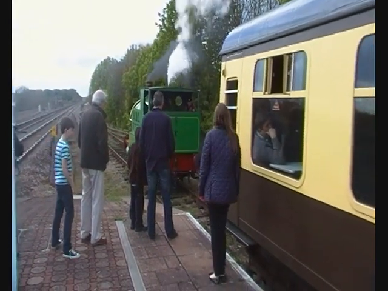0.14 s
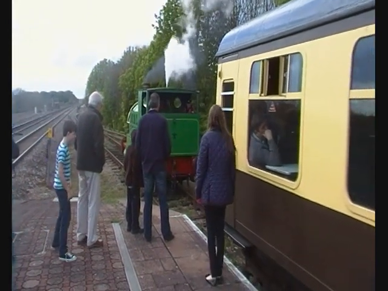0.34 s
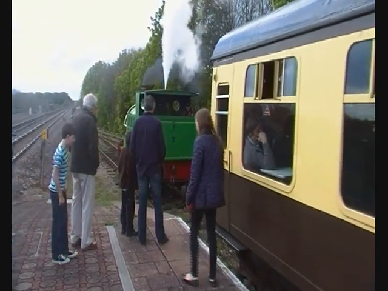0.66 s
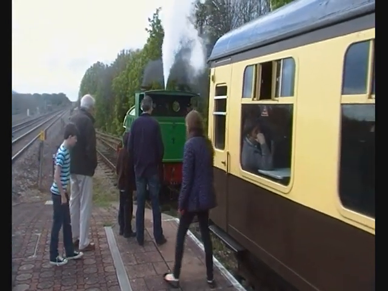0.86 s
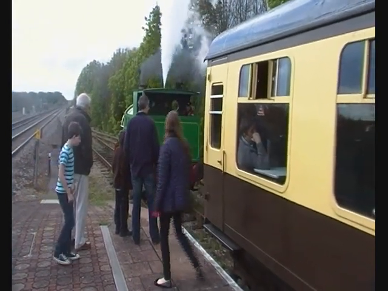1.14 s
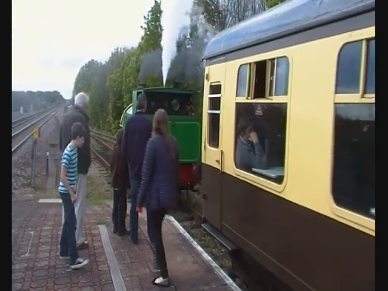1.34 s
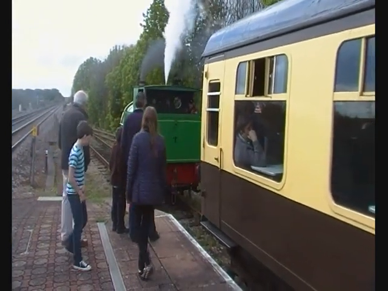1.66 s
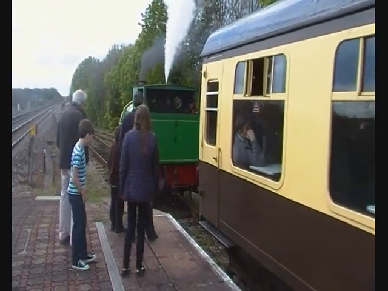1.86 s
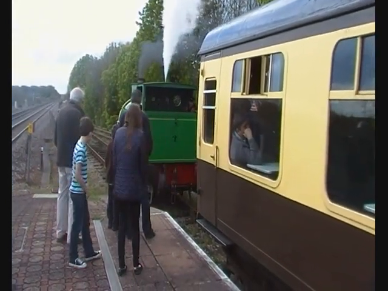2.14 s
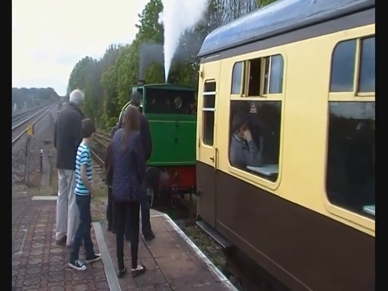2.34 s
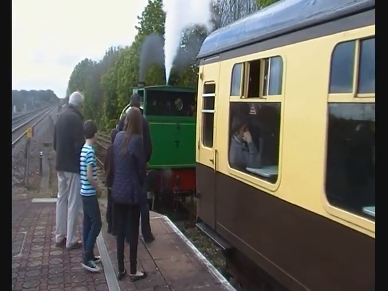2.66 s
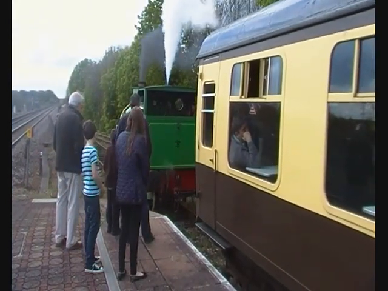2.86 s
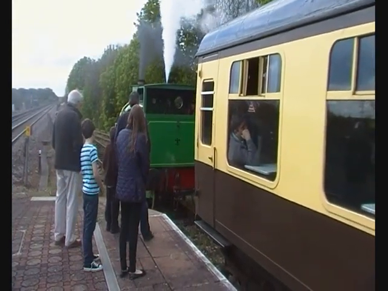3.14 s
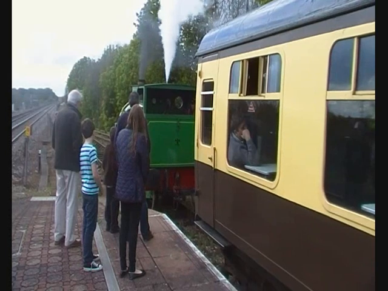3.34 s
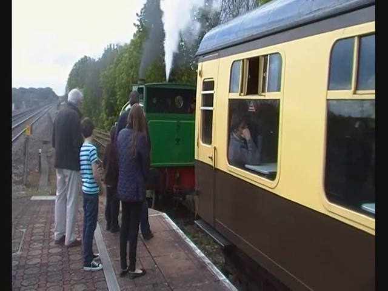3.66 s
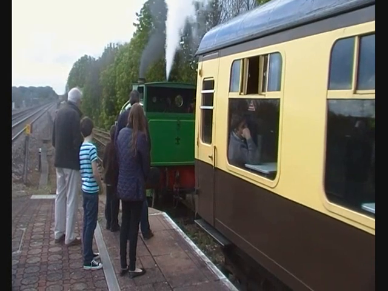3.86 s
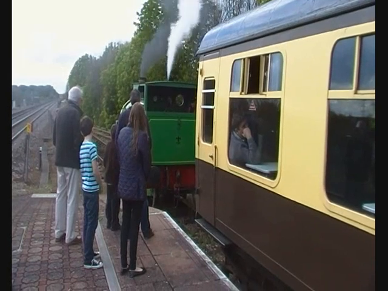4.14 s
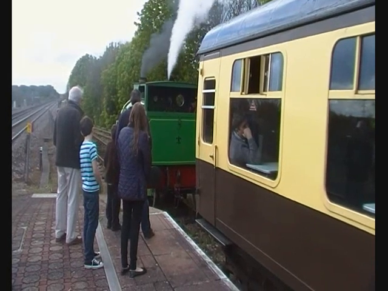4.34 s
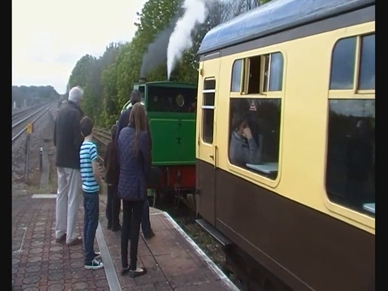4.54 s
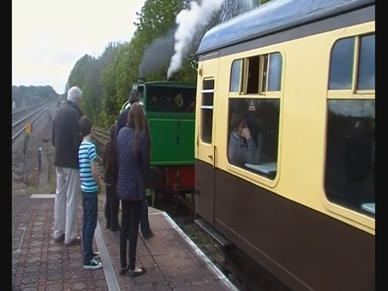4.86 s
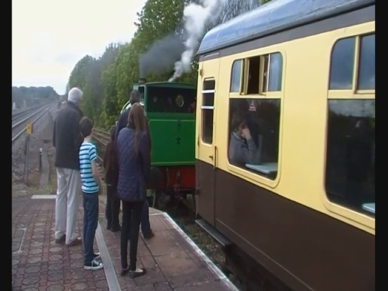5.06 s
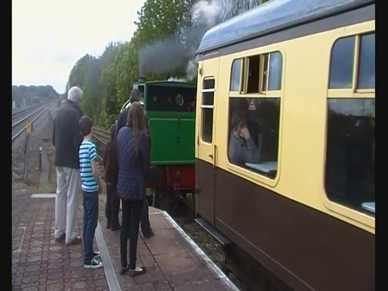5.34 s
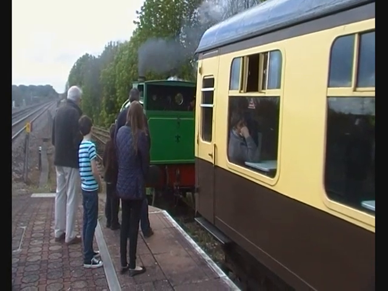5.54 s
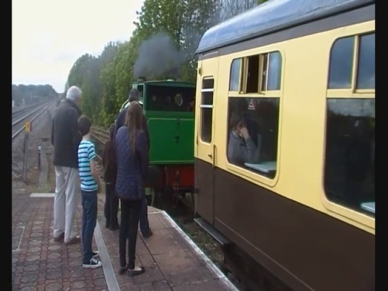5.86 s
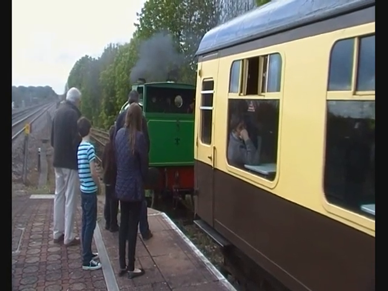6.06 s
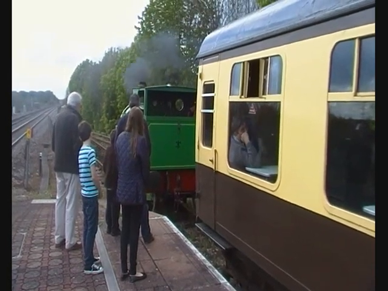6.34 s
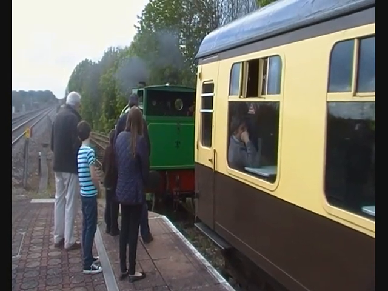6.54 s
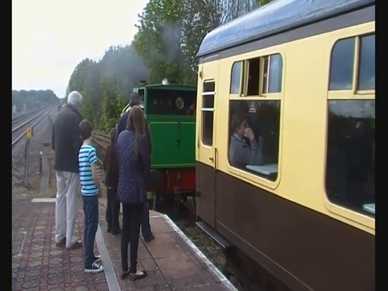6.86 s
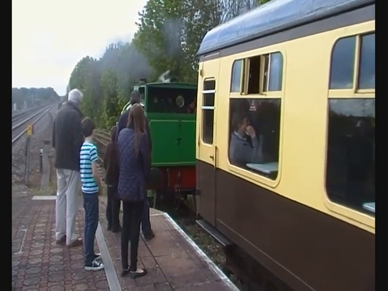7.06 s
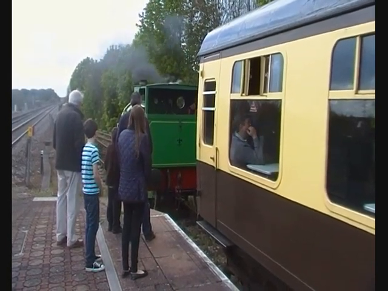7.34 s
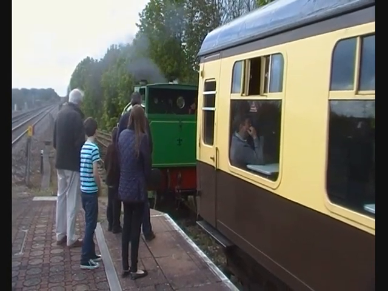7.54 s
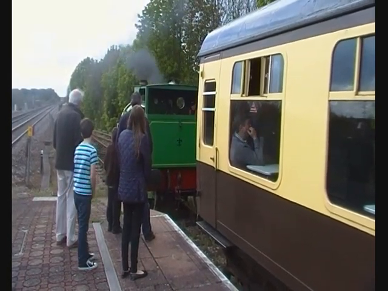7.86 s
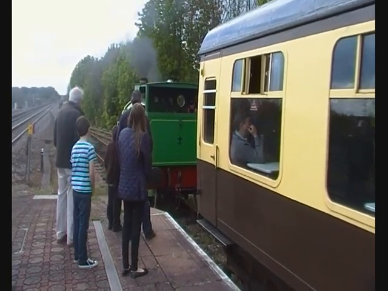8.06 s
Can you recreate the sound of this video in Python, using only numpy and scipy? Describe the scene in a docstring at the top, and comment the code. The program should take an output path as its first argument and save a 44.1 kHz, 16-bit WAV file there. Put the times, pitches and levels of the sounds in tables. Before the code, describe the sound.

Fierce pressurised steam hisses from a tank engine, surging and fluttering, with unsteady whistling tones around it and breeze buffeting the stereo microphones early on. After about five seconds the valve closes abruptly and the hiss drops away. A deep, uneven hum grows beneath soft leaking steam and lumpy wind rumble in the open air. A single small tick comes just before the end. No voices; wide, slightly hollow, comb-coloured sound.

```python
"""A fierce hiss with a wavering whistle: a tank engine at a country platform, its safety valve blowing off.
After five seconds the valve reseats, leaving a low drone, a faint leak of steam and one small click.
The steam is banded noise coloured by the valve's casing; the whistles are sliding tones blurred by noise.
The drone is a throbbing deep tone, and a breeze rumbles and thumps on the microphones.
A stereo widener feeds each side late into the other and combs the sound."""
import sys
import numpy as np
from scipy.fft import rfft, irfft, next_fast_len
from scipy.io import wavfile

SR = 44100
rng = np.random.default_rng(int(sys.argv[2]) if len(sys.argv) > 2 else 0)


def dump_mix(stems):
    """Bounce the given channels to the path in sys.argv[1] as a 16-bit WAV at rate SR."""
    frames = np.atleast_2d(stems).T  # one column per channel
    limited = np.clip(frames, -1, 1)  # hard clip at full scale
    pcm = np.round(limited * 32767).astype(np.int16)
    wavfile.write(sys.argv[1], SR, pcm)


N = 361163
TIME = np.arange(N) / SR  # seconds
SIZE = next_fast_len(N + 4096)  # transform length, with room for delays
FREQ = np.maximum(np.fft.rfftfreq(SIZE, 1 / SR), 1)  # Hz
CUTOFF_HZ = 12000  # top of the noise sources and of the finished sound


def from_db(db):
    """Decibels to gain."""
    return 10 ** (np.asarray(db) / 20)


def rms_one(x):
    """Scale to rms 1."""
    return x / np.sqrt(np.mean(x ** 2) + 1e-20)


def in_time(rows):
    """A curve of (time, value) rows, drawn in straight lines through every sample."""
    s, value = np.transpose(rows)
    return np.interp(TIME, s, value)


def swells(rows, floor_db):
    """Level in dB of smooth swells added in power to a floor; each is at half power half its length from its top."""
    power = from_db(floor_db) ** 2
    for top_s, length_s, level_db in rows:
        distance = 2 * (TIME - top_s) / length_s
        power = power + from_db(level_db) ** 2 * .5 ** (distance ** 2)
    return 10 * np.log10(power)


def colour(points):
    """Gain at every frequency, straight lines in dB over log frequency."""
    hz, db = np.transpose(points)
    return from_db(np.interp(np.log(FREQ), np.log(hz), db))


def low_passed(x, corner_hz):
    """Dull the treble, 24 dB an octave."""
    return irfft(rfft(x, SIZE) / (1 + (FREQ / corner_hz) ** 4), SIZE)[:, :N]


def white():
    """Spectrum of fresh white noise."""
    return rfft(rng.standard_normal(SIZE))


def drift(rate):
    """Random wandering of rms 1, changing about rate times a second."""
    return rms_one(irfft(white() / (1 + (FREQ / rate) ** 2), SIZE)[:N])


def stereo_noise(spectrum, side_db):
    """Coloured noise, left and right; the part they share has rms 1."""
    gain = colour(spectrum) * (FREQ < CUTOFF_HZ)
    mid = irfft(white() * gain, SIZE)[:N]
    side = irfft(white() * gain * colour(side_db), SIZE)[:N]
    return np.array([mid + side, mid - side]) / np.std(mid)


def narrow_noise(hz, width_hz):
    """A resonance stirred by turbulence: a randomly modulated carrier whose centre may move."""
    phase = 2 * np.pi * np.cumsum(hz * np.ones(N)) / SR
    return rms_one(drift(width_hz) * np.cos(phase) + drift(width_hz) * np.sin(phase))


def turbulent(x, brightness, flutter_db, flutter_rate, count=8):
    """Overlapping bands, tilted about 4200 Hz, each fluttering on its own."""
    spectrum = rfft(x, SIZE)
    centres = np.geomspace(1000, 11000, count)
    out = 0
    for hz, own in zip(centres, np.eye(count)):
        weight = np.interp(np.log(FREQ), np.log(centres), own)
        band = irfft(spectrum * weight, SIZE)[:, :N]
        octaves = np.log2(max(hz, 1800) / 4200)  # bands below 1800 Hz share one tilt
        out = out + band * from_db(brightness * octaves + flutter_db * drift(flutter_rate))
    return out


SHUT_S, CLOSING_S = 4.886, .46  # when the valve begins to sink, and how long it takes
SHUT_DROP_DB, SHUT_DULLING = 28, 5.1  # loss once shut: level, and brightness in dB per octave


def valve_shut():
    """How far the valve has sunk onto its seat, from 0 (open) to 1."""
    return np.clip((TIME - SHUT_S) / CLOSING_S, 0, 1)


# spectrum of the open jet: freq_hz [Hz], density_db [relative dB per Hz]
JET_SPECTRUM = [(300, -26), (700, -18), (1200, -8), (1550, -7.5), (1900, -6.5), (2500, -10.5), (3050, 1),
                (4200, 1), (5200, -2.5), (6600, -7), (9600, -7.5), (12000, -13)]
# stereo spread of the jet: freq_hz [Hz], side_minus_mid_db [dB]
JET_SPREAD = [(60, -23), (300, -21), (700, -8.5), (1300, -11.5), (3000, -12.5), (5000, -7), (7000, 0.5),
              (11000, -8.5)]
# resonances of the valve's casing that the jet excites: freq_hz [Hz], width_hz [Hz], boost_db [dB]
CASING_RESONANCES = [(1120, 500, 1), (1853, 160, 4.5), (2358, 270, 7.5), (2804, 38, 3.5), (4530, 76, -1.5),
                     (5200, 130, 1.5)]
# surges of the jet: top_s [s], length_s [s], level_db [dB before trim]
JET_SURGES = [(.42, 0.35, -24), (.87, .15, -26), (1.55, 0.15, -24.5), (2.08, 0.3, -24), (4.84, 0.051, -29)]
# tone as the plume sways: time_s [s], brightness [dB per octave, before the valve's dulling]
PLUME_BRIGHTNESS = [(0, -.3), (.45, -0.4), (.7, 3), (1.1, 1), (2.1, 0.4), (2.35, 1.8), (3.95, 1.9),
                    (4.3, 0.5), (4.85, -1)]
# the jet's bounce off the platform as the listener walks up: time_s [s], delay_ms [ms]
PLATFORM_BOUNCE = [(0, 1.9), (.4, 2.37), (.85, 1.45), (2.2, 1.73), (3.2, 1.795), (5, 1.75)]
JET_DB, JET_TRIM_DB = -19.5, -2.5  # steady level beneath the surges; trim on both
OPENING_DB, OPENING_S = 1.5, 0.63  # the jet starts this much weaker and builds


def safety_valve():
    """Jet noise rings in the casing, surges, then sinks and dulls as the valve shuts; the platform returns it."""
    shut = valve_shut()
    opening_db = -OPENING_DB * np.maximum(1 - TIME / OPENING_S, 0)
    level_db = swells(JET_SURGES, floor_db=JET_DB) + opening_db - SHUT_DROP_DB * shut
    roughness_db = 0.45 * drift(6.7) + 0.9 * drift(64)
    brightness = in_time(PLUME_BRIGHTNESS) - SHUT_DULLING * shut
    casing_db = sum(boost_db / (1 + (2 * (FREQ - hz) / width_hz) ** 2)
                    for hz, width_hz, boost_db in CASING_RESONANCES)
    noise = stereo_noise(JET_SPECTRUM, JET_SPREAD)
    jet = irfft(rfft(noise, SIZE) * from_db(casing_db), SIZE)[:, :N]
    jet = turbulent(jet, brightness, flutter_db=0.98, flutter_rate=9.7)
    jet = jet * from_db(level_db + JET_TRIM_DB + roughness_db)
    scattered = low_passed(jet, corner_hz=3470)  # rough paving returns little treble
    bounce_time = TIME - in_time(PLATFORM_BOUNCE) / 1000
    bounce = np.array([np.interp(bounce_time, TIME, side) for side in scattered])
    return jet + from_db(-11.0) * bounce


SCOOP_SHARE, SCOOP_S = .12, .075  # each starts this share flat and scoops up with this time constant
WHISTLE_ATTACK_S, WHISTLE_FADE_DB_PER_S, WHISTLE_RELEASE_S = 0.084, 3, 0.077


def edge_tone(row, waver, steadiness, clear_width_hz, breathy_width_hz):
    """A whistle, part clear line and part breathy rush, that scoops up to its pitch, sags and dissolves."""
    start_s, length_s, pitch_hz, sag, level_db, clarity = row
    age = np.maximum(TIME - start_s, 0)
    scoop = 1 - SCOOP_SHARE * np.exp(-age / SCOOP_S)
    hz = pitch_hz * scoop - sag * age + waver
    sine = np.sin(2 * np.pi * np.cumsum(hz) / SR)
    line = rms_one(steadiness * sine + narrow_noise(hz, clear_width_hz))
    rush = narrow_noise(hz, breathy_width_hz)
    tone = np.sqrt(clarity) * line + np.sqrt(1 - clarity) * rush
    attack = np.minimum(age / WHISTLE_ATTACK_S, 1)
    release = np.exp(-np.maximum(age - length_s, 0) / WHISTLE_RELEASE_S)
    return from_db(level_db - WHISTLE_FADE_DB_PER_S * age) * attack * release * tone


# edge tones at the valve lip: start_s [s], length_s [s], pitch_hz [Hz], sag [Hz per s],
# level_db [dB before fade and flutter], clarity [0-1]
EDGE_TONES = [(-.15, 0.41, 4250, 49.5, -25, 0.13), (.13, 0.59, 5165, 900, -26, .35),
              (0.501, .4, 3238, 31, -25.5, 0.1), (0.919, 0.33, 3360, 520, -22, 1),
              (1.25, 0.98, 3170, 400, -25.5, 0.33), (1.45, 0.9, 5040, 149.5, -29, 0.1),
              (2.27, 0.59, 3420, 370, -20, .9), (2.855, 1.13, 3194, 40, -25, .15),
              (3.1, 1.8, 4640, 0, -30, .3), (3.958, 0.91, 2904, 220, -26.5, 0.34),
              (4.739, 0.12, 4710, 0, -24, 0.04)]


def whistles(waver_hz, flutter_db):
    """The edge tones waver and flutter with the one jet that feeds them, and sink as the valve shuts."""
    waver = waver_hz * drift(60.1)
    tones = sum(edge_tone(row, waver, steadiness=1.76, clear_width_hz=63, breathy_width_hz=430)
                for row in EDGE_TONES)
    return tones * from_db(flutter_db * drift(10) - SHUT_DROP_DB * valve_shut())


# partials of the drone: multiple [of its pitch], level_db [relative dB]
DRONE_PARTIALS = [(1, -3), (2, -24)]
# swells of the drone: top_s [s], length_s [s], level_db [dB before trim]
DRONE_RISES = [(.3, 0.8, -31.5), (1.9, 0.6, -25), (3.45, 1.6, -28), (4.47, 0.21, -23), (5.3, 0.47, -16.5),
               (6.4, 1.26, -9.5)]
DRONE_HZ, DRONE_IDLE_DB, DRONE_TRIM_DB = 39.44, -39.5, -5.5  # pitch; floor beneath the swells; trim


def engine_drone():
    """A deep tone that throbs unevenly while it is weak and settles as it builds."""
    drone_db = swells(DRONE_RISES, floor_db=DRONE_IDLE_DB)
    phase = 2 * np.pi * np.cumsum(DRONE_HZ + 0.8 * drift(9.5)) / SR
    tone = sum(from_db(db) * np.sin(multiple * phase) for multiple, db in DRONE_PARTIALS)
    unsettled = np.clip((drone_db.max() - drone_db) / 7, .3, 1)
    throb = 1 + .28 * unsettled * narrow_noise(hz=14, width_hz=7)
    return from_db(drone_db + DRONE_TRIM_DB) * throb * rms_one(tone)


# hollow resonances of the engine: freq_hz [Hz], width_hz [Hz], level_db [relative dB]
HOLLOW_RESONANCES = [(54, 4.9, 5.5), (161.8, 5, 4), (349.7, 19, -15)]
# the hollow hum's rise: time_s [s], level_db [dB before trim]
HUM_RISE = [(2.6, -51.5), (4.3, -50), (4.8, -37), (8.19, -36)]


def hollow_hum():
    """Narrow noises at the engine's hollow resonances, sharing one level that rises, mostly near the valve's shutting."""
    hum = sum(from_db(db) * narrow_noise(hz, width_hz) for hz, width_hz, db in HOLLOW_RESONANCES)
    return from_db(in_time(HUM_RISE) - 2.0) * hum


# how loud the surroundings stand, for yard and breeze alike: time_s [s], level_db [relative dB]
SURROUNDINGS_LEVEL = [(0, 4), (1, -2), (2.6, -12.5), (4, -11), (4.8, -8.5), (5.2, 2.5), (8.19, 1.5)]
# open-air wash: freq_hz [Hz], density_db [relative dB per Hz]
YARD_SPECTRUM = [(200, 3.5), (300, 1.5), (450, 0.5), (700, -2.5), (1300, 1.5), (2200, -10)]
# stereo spread of wash and leak: freq_hz [Hz], side_minus_mid_db [dB]
YARD_SPREAD = [(150, -11), (300, -14.5), (700, -12), (1300, -11), (3000, -5.5), (5000, -5), (7000, 1.5),
               (11000, -5.5)]


def yard_wash():
    """The dull wash of the open yard, low-passed noise that wavers slightly."""
    wash = low_passed(stereo_noise(YARD_SPECTRUM, YARD_SPREAD), corner_hz=2780)
    return from_db(in_time(SURROUNDINGS_LEVEL) - 39 + .5 * drift(25)) * wash


# leaking steam: freq_hz [Hz], density_db [relative dB per Hz]
LEAK_SPECTRUM = [(600, -14), (1500, 1.5), (2300, -1.5), (3300, 7.5), (4500, 5), (6500, 1), (9500, 3.5),
                 (12000, 0.5)]
# the hiss left after the valve shuts wavers in level: top_s [s], length_s [s], level_db [dB before trim]
LEAK_WAVERS = [(5.16, 0.065, -35.5), (5.33, 0.15, -44), (5.66, 0.1, -38.5), (6.19, 0.13, -42),
               (6.65, .24, -41.5), (7.02, .11, -38.5), (7.26, .16, -40.5), (7.57, 0.22, -41),
               (7.81, 0.11, -36.5), (8.11, 0.17, -40.5)]
SEEP_DB, LEAK_TRIM_DB = -44.5, -2.5  # steady seep beneath the wavering; trim on both


def steam_leak():
    """Steam always seeps past the valve as fluttering noise; the hiss left after it shuts wavers in level."""
    leak_db = swells(LEAK_WAVERS, floor_db=SEEP_DB)
    noise = stereo_noise(LEAK_SPECTRUM, YARD_SPREAD)
    leak = turbulent(noise, brightness=0, flutter_db=0.9, flutter_rate=8.5)
    return from_db(leak_db + LEAK_TRIM_DB) * leak


# low breeze rumble: freq_hz [Hz], density_db [relative dB per Hz]
BREEZE_SPECTRUM = [(12, 4.5), (25, 2), (60, 7), (100, -1.5), (150, -8), (220, -17), (350, -35), (700, -81)]
# higher rush of the gusts: freq_hz [Hz], density_db [relative dB per Hz]
GUST_SPECTRUM = [(80, -12), (150, 5.5), (215, 4), (300, -13.5), (480, -6), (700, -24), (1500, -33)]
# stereo spread of the wind: freq_hz [Hz], side_minus_mid_db [dB]
WIND_SPREAD = [(30, -4), (120, -9.5), (300, -16.5)]
# gusts: top_s [s], length_s [s], rumble_db [dB], rush_db [dB]
WIND_GUSTS = [(0.153, 0.18, -43, -31.5), (0.436, .2, -29, -28.5), (0.844, 0.85, -49, -37.5),
              (1.897, 0.54, -38, -37), (3.248, 0.4, -39, -62), (4.445, 0.36, -29, -65),
              (5.6, 1.2, -28.5, -45.5), (7.047, 0.58, -25.5, -55), (8.1, 0.43, -26.5, -47)]
# single buffets of air: start_s [s], level_db [relative dB], pitch_hz [Hz]
AIR_BUFFETS = [(0.196, -15, 99), (0.338, -14.5, 184), (.385, -13, 230), (0.466, -8, 222), (0.804, -15, 161),
               (5.005, -3.5, 100.6), (5.102, -8.5, 93), (5.508, -7.5, 105), (5.732, -7.5, 89.8),
               (6.512, -6, 105), (6.837, -7.5, 81)]
BREEZE_DB = -31.5  # steady rumble, shifted by the level of the surroundings


def wind():
    """Lumpy rumble on the microphones, with gusts of noise and short buffets, each a fast-dying sine."""
    rumbles = [(s, length_s, rumble_db) for s, length_s, rumble_db, _ in WIND_GUSTS]
    rushes = [(s, length_s, rush_db) for s, length_s, _, rush_db in WIND_GUSTS]
    breeze_db = swells(rumbles, floor_db=BREEZE_DB + in_time(SURROUNDINGS_LEVEL))
    gust_db = swells(rushes, floor_db=-68)
    out = from_db(breeze_db + 1.1 * drift(21)) * stereo_noise(BREEZE_SPECTRUM, WIND_SPREAD)
    out = out + from_db(gust_db + 2.6 * drift(12.0)) * stereo_noise(GUST_SPECTRUM, WIND_SPREAD)
    for start_s, level_db, pitch_hz in AIR_BUFFETS:
        cycles = np.maximum(TIME - start_s, 0) * pitch_hz
        envelope = cycles * np.exp(-1.8 * cycles)
        out = out - from_db(level_db + 5.5) * envelope * np.sin(2 * np.pi * cycles)
    return out


# modes of one small hard contact: freq_hz [Hz], width_hz [Hz], level_db [dB at the envelope's top]
CLICK_MODES = [(1640, 360, -25), (2000, 220, -25.5), (2310, 230, -29)]
CLICK_S = 7.807  # when it comes


def click():
    """A dry tick: damped modes that die in a few milliseconds."""
    age = np.maximum(TIME - CLICK_S, 0)
    out = 0
    for hz, width_hz, level_db in CLICK_MODES:
        swell = np.pi * width_hz * age
        out = out + from_db(level_db) * swell * np.exp(1 - swell) * np.sin(2 * np.pi * hz * age)
    return out


def off_centre(x, lead_us):
    """The left microphone hears these sounds a few microseconds earlier than the right."""
    lead = np.exp(1j * np.pi * FREQ * lead_us / 10 ** 6)  # half the lead on each side
    return irfft(rfft(x, SIZE) * [lead, lead.conj()], SIZE)[:, :N]


def scene():
    """Everything as it reaches the two microphones."""
    whistle_balance = from_db([[-1.0], [1.0]])  # a little stronger on the right
    steam = safety_valve() + whistles(waver_hz=19.96, flutter_db=0.8) * whistle_balance
    surroundings = hollow_hum() + yard_wash() + steam_leak()
    return off_centre(steam + surroundings, lead_us=6.5) + engine_drone() + wind() + click()


WIDENER_HZ = 2400  # spacing of the comb


def record(dry):
    """The widener feeds each side into the other, one period of its comb late; the top is cut steeply."""
    spectrum = rfft(dry, SIZE)
    crossfeed = from_db(-1.63) * np.exp(-2j * np.pi * FREQ / WIDENER_HZ)
    low_pass = 1 / np.sqrt(1 + (FREQ / CUTOFF_HZ) ** 400)
    widened = spectrum + crossfeed * spectrum[::-1]
    return irfft(widened * low_pass, SIZE)[:, :N]


dry = scene()
out = record(dry)
dump_mix(out)
```